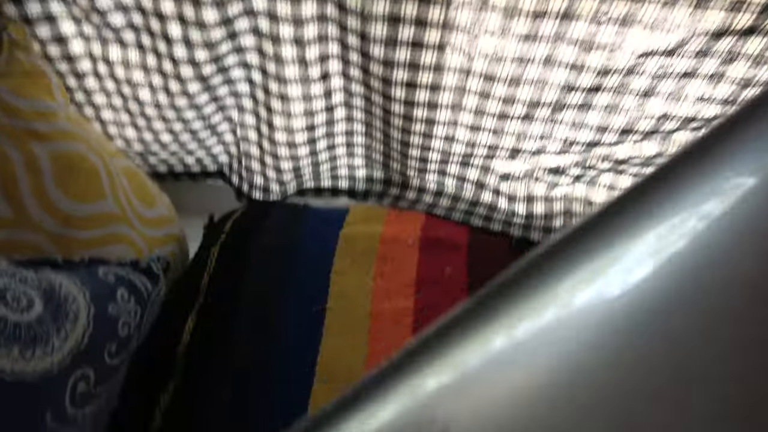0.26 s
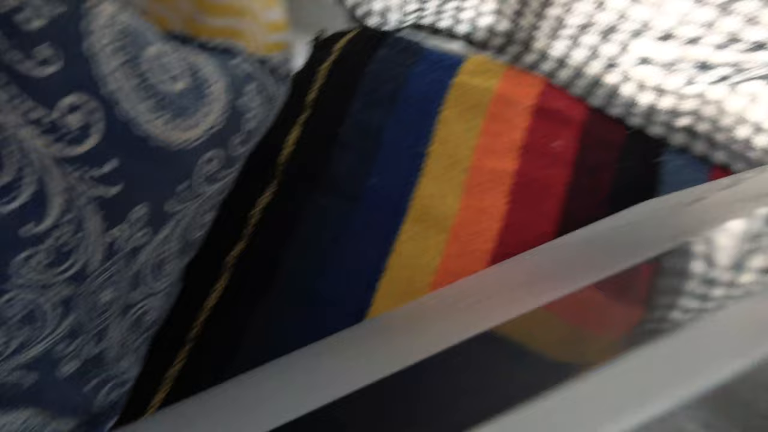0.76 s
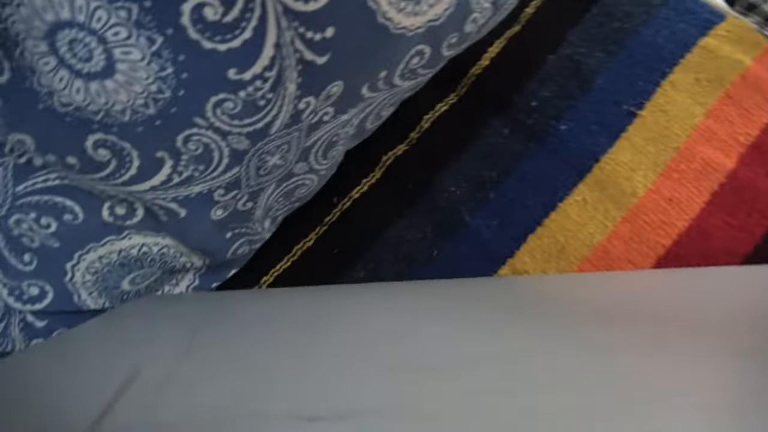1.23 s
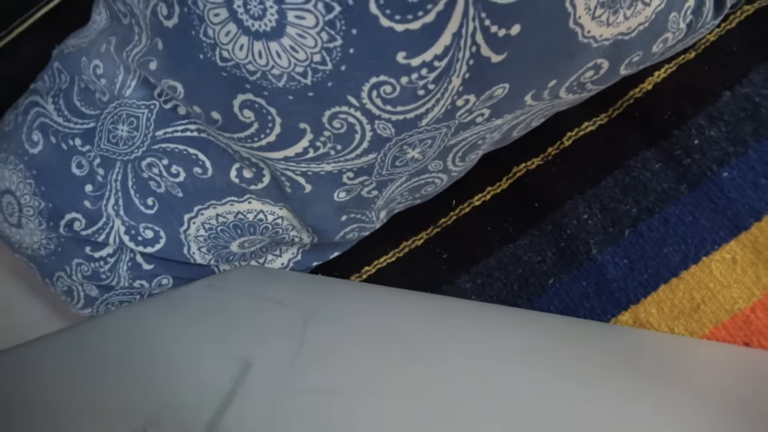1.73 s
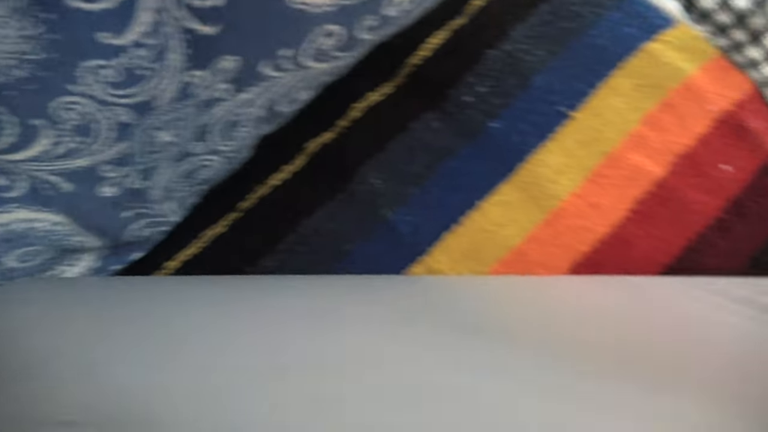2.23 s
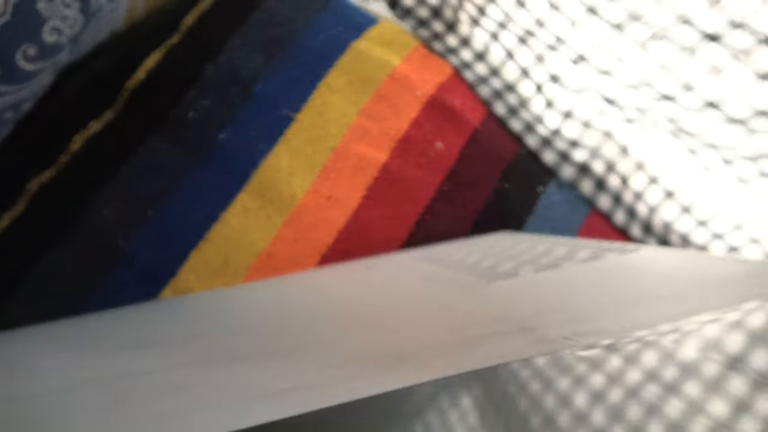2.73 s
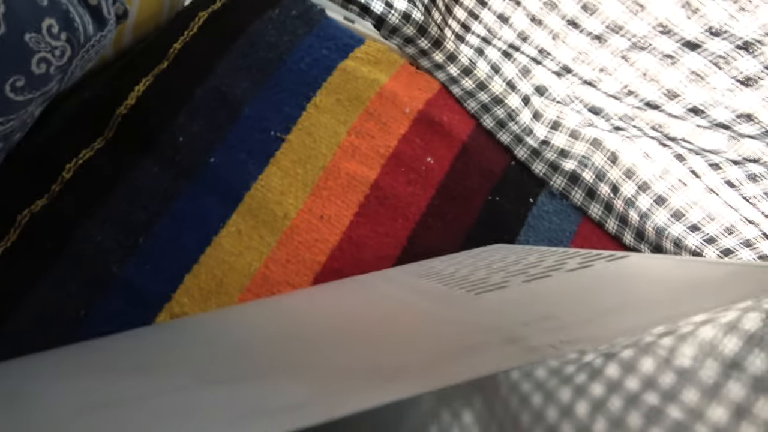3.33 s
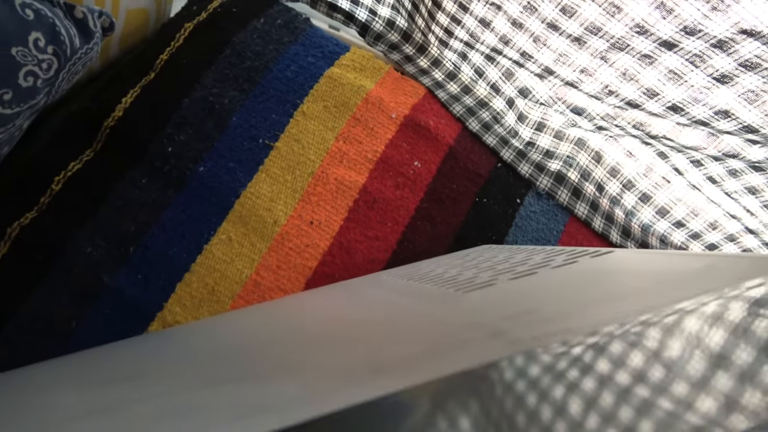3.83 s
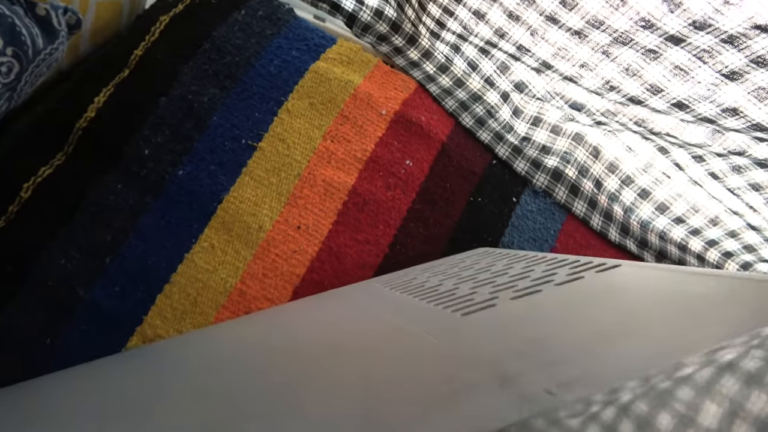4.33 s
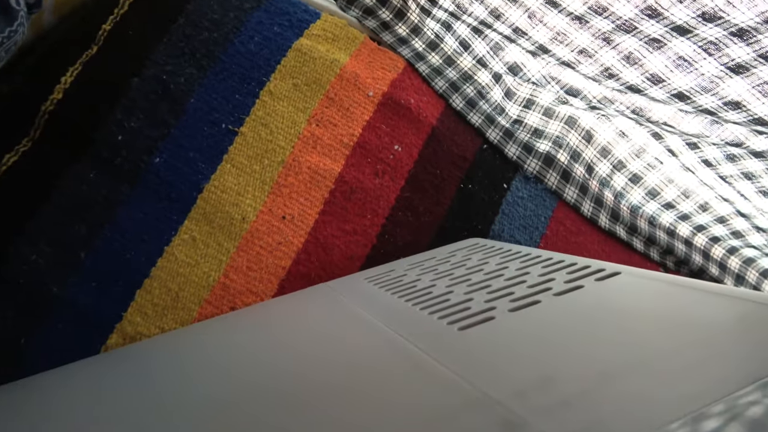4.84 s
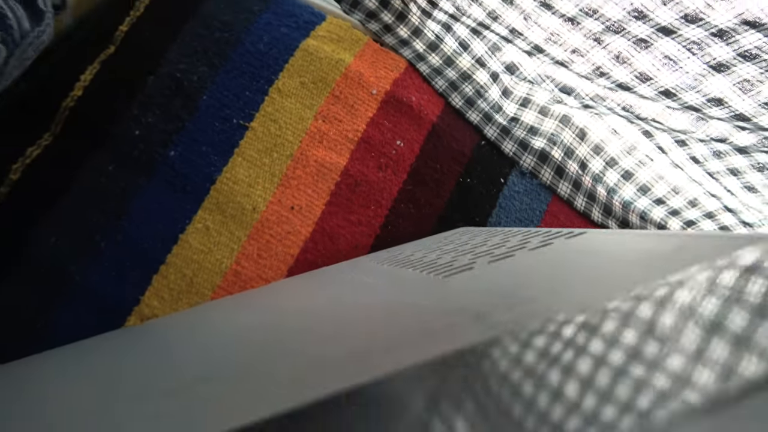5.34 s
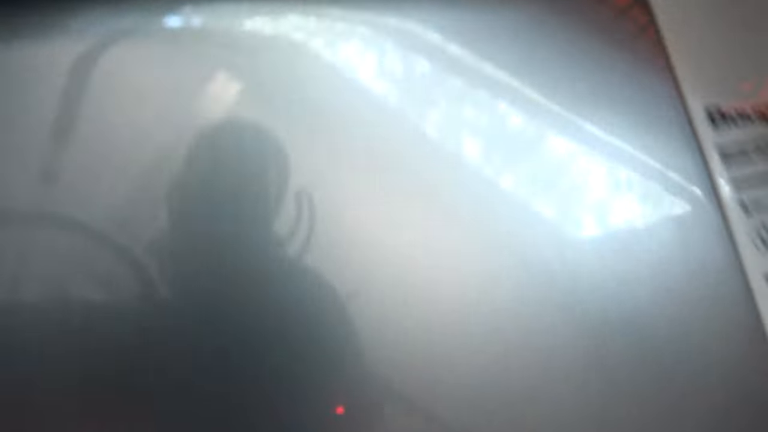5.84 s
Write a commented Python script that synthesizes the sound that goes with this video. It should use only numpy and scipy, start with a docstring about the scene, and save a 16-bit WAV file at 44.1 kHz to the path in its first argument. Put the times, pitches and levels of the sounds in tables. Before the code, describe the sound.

A small compressor fridge runs throughout, heard close up inside a parked van: a steady, slightly wavering low hum with soft fan air, a faint hiss and thin high whistles. During the first second and a half, cloth rustles softly and a hand rumbles on the microphone. Fingers tick on the plastic lid at about 0.4 and 1 second, with light knocks and two tiny pipe pings between them.

From about 1.6 to 2.2 seconds the lid is bumped: a quick run of hollow thumps and plastic clacks with a short latch scrape, the loudest moment. From around 2.6 seconds the hum and fan grow gradually louder as the microphone nears the vent, peaking a little after 5 seconds. Faint high pings come at 3.4 and 4.9 seconds. Cloth swishes softly near 3.9 seconds and again around 5.8 to 6.1 seconds, over the continuing hum.

```python
"""A small compressor fridge runs in a parked van: its valves buzz in the steel shell and the fan's
blade tone beats against the compressor's second order. From the start the hand on the microphone
rumbles and cloth rustles. Fingers tick on the plastic lid, light knocks follow and a cooling pipe
pings. Near two seconds the lid is bumped, its latch scrapes and it clatters briefly. Then hum and fan
grow louder as the microphone nears the vent; the pipe pings twice more and cloth brushes past."""
import sys
import numpy as np
from scipy import signal
from scipy.fft import rfft, irfft, next_fast_len
from scipy.io import wavfile

SR = 44100
rng = np.random.default_rng(int(sys.argv[2]) if len(sys.argv) > 2 else 0)


def pcm_store(signal):
    """Save signal as 16-bit PCM."""
    levels = np.round(np.clip(np.atleast_2d(signal), -1, 1) * 32767)
    wavfile.write(sys.argv[1], SR, levels.astype(np.int16).T)


N = 268745
TIME = np.arange(N) / SR
CUTOFF_HZ = 15650


def from_db(db):
    """Decibels to amplitude ratio."""
    return 10 ** (np.asarray(db) / 20)


def unit_power(x):
    """Normalisation to a mean square of 1."""
    return x / np.sqrt(np.mean(x ** 2) + 1e-20)


def in_time(rows):
    """Linear interpolation between (time_s, value) points."""
    return np.interp(TIME, *np.transpose(rows))


def swell(peak_s, half_width_s):
    """A Gaussian envelope of height 1."""
    return np.exp(-((TIME - peak_s) / half_width_s) ** 2)


def drift(rate_hz):
    """Low-passed noise: a random wander of unit power."""
    step, settle = 100, 2000
    r = np.exp(-2 * np.pi * rate_hz * step / SR)
    slow = signal.lfilter([1], [1, -2 * r, r * r], rng.standard_normal(N // step + settle + 2))[settle:]
    return np.interp(np.arange(N) / step, np.arange(len(slow)), unit_power(slow))


def noise(spectrum):
    """Spectrally shaped noise of unit power, falling away beyond both ends."""
    hz, db = np.transpose(spectrum)
    size = next_fast_len(N, real=True)
    f = np.maximum(np.arange(size // 2 + 1) * SR / size, 1)
    skirts = (np.minimum(f / hz[0], 1) * np.minimum(hz[-1] / f, 1)) ** 2
    gain = from_db(np.interp(np.log(f), np.log(hz), db)) * skirts
    return unit_power(irfft(rfft(rng.standard_normal(size)) * gain, size)[:N])


def soften(x, hz):
    """A second-order low-pass."""
    return signal.sosfilt(signal.butter(2, min(hz, CUTOFF_HZ), fs=SR, output="sos"), x)


def strikes(times_s, db):
    """Impulsive excitation: one click for each contact."""
    clicks = np.zeros(N)
    clicks[(times_s * SR).astype(int)] = from_db(db)
    return clicks


def ring(clicks, hz, t60_s):
    """A damped mode: a unit click starts a decaying sine of height 1."""
    r, w = np.exp(-np.log(1000) / (t60_s * SR)), 2 * np.pi * hz / SR
    return signal.lfilter([0, np.sin(w)], [1, -2 * r * np.cos(w), r * r], clicks + 1e-18)


def resonate(x, hz, width_hz):
    """A driven resonance of gain 1 at its peak."""
    r, w = np.exp(-np.pi * width_hz / SR), 2 * np.pi * hz / SR
    return signal.lfilter([(1 - r * r) / 2, 0, (r * r - 1) / 2], [1, -2 * r * np.cos(w), r * r], x)


def tone(cycles, waver_db):
    """A sine of unit power under slow random amplitude modulation."""
    return np.sqrt(2) * np.sin(2 * np.pi * cycles) * from_db(waver_db * drift(3.1))


# reflections from nearby walls: delay_s, gain_db
REFLECTIONS = [(.0023, -17), (.0041, -17), (.0067, -16), (.0094, -16)]


def walls(x):
    """Comb filtering by short reflections, whose paths shift slightly as the microphone moves."""
    echoes = sum(from_db(db) * np.interp(TIME - delay_s * (1 + .03 * drift(.3)), TIME, x)
                 for delay_s, db in REFLECTIONS)
    return unit_power(x + echoes)


# harmonics of the hum: crank_multiple, relative_db
CRANK_ORDERS = [(1, -0.5), (2, -4.5), (3, -20), (4, -23.5), (7, -38), (8, -38), (25, -52)]
# high orders that whistle in the shell: crank_multiple, peak_relative_db, antinode_s
WHISTLES = [(54, -19, 3.0), (66, -15, 4.3), (72, -9, 2.5), (77, -14, 4.6), (78, -11, 4.9), (87, -19, 3.5),
            (89, -15, 3.6), (90, -13, 2.6), (95, -22, 4.0), (160, -28, 4.7)]
# resonances of the steel shell: pitch_hz, width_hz, relative_db
SHELL_MODES = [(3590, 160, 7), (3900, 35, 17), (4140, 210, -2), (4076, 23, -2), (4260, 50, -12)]
# spectrum of the gas hiss: frequency_hz, relative_db
GAS_SPECTRUM = [(1500, -12), (2500, -4), (3300, 5), (4100, 5), (4900, -4), (6200, -9), (7200, -16.5),
                (7900, -14.5), (9000, -27.5), (12000, -23.5), (16000, -25)]
CRANK_HZ, WHISTLE_FADE_DB = 49.76, 6


def compressor(hum_db, hiss_db):
    """Periodic forcing: each piston stroke shakes the case, ticks the valves and passes a puff of gas."""
    turns = CRANK_HZ * TIME + .0012 * drift(1)
    hum = sum(from_db(db) * tone(round(k) * turns, waver_db=.5 if k < 2 else 1.2)
              for k, db in CRANK_ORDERS)
    whistles = 0
    for k, db, antinode_s in WHISTLES:  # each swells as the microphone passes its antinode
        fade_db = WHISTLE_FADE_DB * (1 - swell(antinode_s, half_width_s=1))
        whistles += from_db(db - fade_db) * tone(k * turns + rng.random(), waver_db=2)
    half_angle = np.pi * (turns % 1) + 1e-9
    ticks = unit_power(np.sin(241 * half_angle) / np.sin(half_angle))  # 120 equal crank orders
    valves = ticks + 1.7 * rng.standard_normal(N)
    buzz = unit_power(sum(from_db(db + 1.8 * drift(.54)) * resonate(valves, hz, width_hz)
                          for hz, width_hz, db in SHELL_MODES))
    puffs = 1 + .5 * np.cos(np.pi * turns) ** 16
    gas = walls(noise(GAS_SPECTRUM) * puffs) * from_db(.5 * drift(5.3))
    return from_db(hum_db) * hum + from_db(hiss_db) * (gas + whistles + from_db(-28) * buzz)


# rate of blade passes: time_s, rate_hz
BLADE_RATE = [(0, 93.8), (1, 92.55), (3.5, 92.55), (4.2, 92.95), (6.1, 92.8)]
# overtones, set against the air noise: blade_multiple, relative_db
BLADE_ORDERS = [(3, -13), (4, -21.5), (12, -21.5)]
# spectrum of air in the grille: frequency_hz, relative_db
AIR_SPECTRUM = [(200, -20), (400, -6), (650, -1.5), (850, 1), (1050, -0.5), (1300, 0.5), (1700, -5),
                (2400, -10.5), (4000, -18), (9000, -24.5), (16000, -31)]


def fan(blade_db, air_db):
    """A tone at the blade-passing frequency, faint harmonics, and broadband air noise from the grille."""
    passes = np.cumsum(in_time(BLADE_RATE)) / SR
    overtones = sum(from_db(db) * tone(round(k) * passes, waver_db=4.5) for k, db in BLADE_ORDERS)
    air = from_db(-2 + .5 * drift(11)) * walls(noise(AIR_SPECTRUM))
    return from_db(blade_db) * tone(passes, waver_db=3.5) + from_db(air_db) * (air + overtones)


# tones of the casing panels: pitch_hz, relative_db
PANEL_TONES = [(186.4, 1.5), (255.3, -7.5)]
# spectrum of the casing's rumble: frequency_hz, relative_db
RUMBLE_SPECTRUM = [(8, -37), (12, 16.5), (20, 8), (32, -3), (60, 2.5), (85, -1), (120, 6.5), (150, -2),
                   (200, -10), (280, -16), (400, -22.5), (700, -24.5), (1200, -64)]
DRONE_HZ = 129.1


def casing(drone_db, tones_db, rumble_db):
    """Vibrating panels radiate slightly unsteady tones over a low rumble."""
    drone = from_db(drone_db) * tone(DRONE_HZ * TIME + .15 * drift(1), waver_db=.9)
    tones = sum(from_db(db) * tone(hz * TIME + .2 * drift(1), waver_db=2.5) for hz, db in PANEL_TONES)
    return drone + from_db(tones_db) * tones + from_db(rumble_db) * noise(RUMBLE_SPECTRUM)


# spectrum of the hand's throb: frequency_hz, relative_db
THROB_SPECTRUM = [(10, 0), (19, 2), (30, -10), (60, -24), (150, -28), (300, -38), (600, -60)]
GRIP_S, GRIP_ATTACK_S, GRIP_HOLD_S, GRIP_RELEASE_S = .33, .07, .31, .8
MOVING_GRIP_DB, RESTING_GRIP_DB = -24, -40.5


def grip():
    """Structure-borne noise: the hand on the microphone throbs, most as it shifts its grip once."""
    corners_s = np.cumsum([GRIP_S, GRIP_ATTACK_S, GRIP_HOLD_S, GRIP_RELEASE_S])
    shift = np.interp(TIME, corners_s, [0, 1, 1, 0])
    return (from_db(RESTING_GRIP_DB) + from_db(MOVING_GRIP_DB) * shift) * noise(THROB_SPECTRUM)


# spectra of the soft swish and the crisp rustle: frequency_hz, relative_db
SWISH_SPECTRUM = [(2500, -0.5), (5500, -4.5), (7600, -8.5), (8600, -16), (14000, -27)]
RUSTLE_SPECTRUM = [(4000, -2), (8500, -3), (12500, 1.5), (16000, -12)]
# passes of the cloth: peak_s, half_width_s, swish_db, rustle_db
BRUSHES = [(.11, 0.065, -55, -64), (.42, 0.35, -61, -67), (0.91, 0.25, -59, -75), (1.238, 0.25, -74, -66.5),
           (3.9, 0.16, -54.5, -77), (5.45, 0.03, -70, -64), (5.71, 0.093, -78, -57),
           (5.853, 0.044, -48.5, -60), (6.06, 0.073, -51.5, -64)]


def cloth():
    """Friction noise: a grainy swish and rustle swell and fade as cloth brushes past."""
    grain = from_db(2 * drift(70))
    swish = unit_power(noise(SWISH_SPECTRUM) * grain)
    rustle = unit_power(noise(RUSTLE_SPECTRUM) * grain)
    return sum(swell(peak_s, half_width_s) * (from_db(swish_db) * swish + from_db(rustle_db) * rustle)
               for peak_s, half_width_s, swish_db, rustle_db in BRUSHES)


# spectra of the hollow clack and the bright snap: frequency_hz, relative_db
CLACK_SPECTRUM = [(200, 13), (350, -1.5), (450, -1), (650, 1), (1000, -2), (1300, -7), (1700, -13),
                  (2200, -4), (3500, -20), (6000, -30)]
SNAP_SPECTRUM = [(1000, -3), (2100, -10.5), (2700, -4), (3400, 6), (4100, 0), (5000, -5), (6500, -14.5),
                 (9000, -18), (12000, -21.5), (16000, -38)]


def plastic_noise():
    """Contact noise of plastic: a clack and a snap under one grainy amplitude modulation."""
    grain = from_db(1.3 * drift(120))
    return walls(noise(CLACK_SPECTRUM)) * grain, walls(noise(SNAP_SPECTRUM)) * grain


def contact(plastic, start_s, clack_db, snap_db, hardness_hz, t60_s):
    """An impact's noise decays exponentially; a softer contact has a lower cutoff."""
    clack, snap = plastic
    decay = np.exp(-np.log(1000) * TIME[:SR // 2] / t60_s)
    span = slice(int(start_s * SR), int(start_s * SR) + len(decay))
    burst = decay * (from_db(clack_db) * clack[span] + from_db(snap_db) * snap[span])
    out = np.zeros(N)
    out[span] = soften(burst, hardness_hz)
    return out


# fingers touching the lid: start_s, clack_db, snap_db, hardness_hz
FINGER_TICKS = [(.374, -36, -27.5, 15000), (0.941, -55, -39, 13000), (0.982, -28.5, -31, 3000)]


def finger_ticks(plastic):
    """Light impacts on plastic make transients that die at once."""
    return sum(contact(plastic, *tick, t60_s=.021) for tick in FINGER_TICKS)


# modes of the plastic lid: pitch_hz, relative_db, t60_s
LID_MODES = [(462, -2, 0.14), (562, -9.5, 0.4), (834, -1, 0.079), (950, 1.5, 0.07), (1310, -25, 0.041),
             (1497, -4.5, 0.06), (1850, -3, 0.016), (1960, -8, 0.086), (2110, -6, 0.047), (2170, -8, 0.035),
             (2482, -9, 0.08)]


def lid_ring():
    """Modal ringing: every tick and knock excites the lid in a mix that depends on the spot struck."""
    hits = [(s, db) for s, _, _, db, _, _ in LID_KNOCKS] + [(s, db) for s, db, _, _ in FINGER_TICKS]
    start_s, clack_db = np.transpose(hits)
    drive_db = clack_db - 8
    spots_db = rng.normal(0, 1.5, (len(hits), len(LID_MODES))).T
    return sum((-1) ** k * ring(strikes(start_s, drive_db + db + spots_db[k]), hz, t60_s)
               for k, (hz, db, t60_s) in enumerate(LID_MODES))


# knocks on the lid: start_s, thump_db, favoured_hz, clack_db, hardness_hz, t60_s
LID_KNOCKS = [(0.584, -40, 287, -44, 2000, .06), (.732, -34.5, 242, -62, 2000, .04),
              (1.640, -14, 160, -24.5, 3500, 0.059), (1.778, -8, 94.6, -22, 8000, 0.075),
              (1.819, -8, 233, -29.5, 5500, 0.17), (1.906, -15.5, 100, -33, 3500, .07),
              (1.923, -15.5, 234, -48, 3000, .07), (1.934, -21, 157, -27, 3800, .2),
              (1.954, -12, 154, -47, 3000, .25), (1.998, -11, 103, -35.5, 3000, 0.088),
              (2.016, -13, 71, -18.5, 12000, 0.13), (2.070, -13.5, 95, -33.5, 4000, 0.25)]
SNAP_DB, CHATTER_DB = -7, -12  # against the clack; against the knock
MIDDLING_HZ, SNAP_DB_PER_OCTAVE = 5000, 1.5


def lid_clatter(plastic):
    """Harder impacts carry more treble and so snap more; each knock trails a weaker chatter."""
    out = np.zeros(N)
    for start_s, _, _, clack_db, hardness_hz, t60_s in LID_KNOCKS:
        snap_db = clack_db + SNAP_DB + SNAP_DB_PER_OCTAVE * np.log2(hardness_hz / MIDDLING_HZ)
        out += contact(plastic, start_s, clack_db, snap_db, hardness_hz, t60_s)
        out += contact(plastic, start_s, clack_db + CHATTER_DB, snap_db + CHATTER_DB,
                       hardness_hz=3800, t60_s=.23)
    return out


# modes of the hollow cabinet: pitch_hz, relative_db, t60_s
CABINET_MODES = [(70.7, 6.5, 0.19), (93.6, 13, 0.048), (153.3, 5, 0.14), (232, -0.5, 0.28),
                 (275, -4.5, 0.21), (338, -3.5, .14)]
REBOUND_S, REBOUND_OVER_CLACK_DB, REBOUND_HZ = .0121, 4, 244


def cabinet_thumps():
    """Selective excitation: a cushioned knock and the lid's rebound ring modes near a favoured pitch."""
    start_s, thump_db, favoured_hz, clack_db, *_ = np.transpose(LID_KNOCKS)
    blows = [(start_s, thump_db, favoured_hz),
             (start_s + REBOUND_S, clack_db + REBOUND_OVER_CLACK_DB, REBOUND_HZ)]
    out = np.zeros(N)
    for k, (hz, db, t60_s) in enumerate(CABINET_MODES):
        for at_s, blow_db, pitch_hz in blows:
            mismatch_db = 14 * np.minimum(np.abs(np.log2(hz / pitch_hz)), 1)
            clicks = strikes(at_s, blow_db + db - mismatch_db)
            out += (-1) ** k * ring(clicks, hz, t60_s)  # opposed modes swell in
    return soften(out, hz=405)


# thin pings of the cooling pipe: start_s, level_db, pitch_hz
PIPE_PINGS = [(0.741, -37.5, 4050), (.800, -43, 4050), (3.437, -42, 4120), (4.896, -35, 3890)]


def pipe_pings():
    """Free vibration of the pipe: each ping is one high, damped mode."""
    return sum(ring(strikes(start_s, db), hz, t60_s=.056) for start_s, db, hz in np.array(PIPE_PINGS))


# modes of the latch: pitch_hz, relative_db, t60_s
LATCH_MODES = [(2450, -3, 0.03), (2840, -4, .035), (3150, -7, .04), (3310, 3.5, 0.034), (3350, -9, 0.062),
               (3740, 3.5, 0.029), (4040, -9, 0.035)]
LATCH_S, LATCH_DB, SLIP_S, SLIP_LOSS_DB = 1.682, -26, .0027, 5.5


def latch(plastic):
    """Stick-slip friction: the latch scrapes over in four weakening slips that ring clustered modes."""
    slip = np.arange(4)
    slips_s = LATCH_S + SLIP_S * slip * rng.uniform(.85, 1.15, len(slip))
    clicks = strikes(slips_s, LATCH_DB - SLIP_LOSS_DB * slip)
    modes = sum((-1) ** k * from_db(db) * ring(clicks, hz, t60_s)
                for k, (hz, db, t60_s) in enumerate(LATCH_MODES))
    scrape = contact(plastic, LATCH_S, clack_db=-np.inf, snap_db=-31.5, hardness_hz=5500, t60_s=.16)
    return modes + scrape


def node_loss(nodes):
    """Standing waves: the dB a tone loses as the microphone crosses nodes; antinodes are negative."""
    return sum(loss_db * swell(time_s, half_width_s) for time_s, half_width_s, loss_db in nodes)


# nearness to the vent, as a level taken about its mean: time_s, level_db
NEARNESS = [(0, -46.8), (0.9, -45.1), (1.4, -44.8), (2.6, -44.5), (3.5, -42.4), (4.4, -40.1), (5.3, -38.0),
            (6.09, -38.7)]
# standing waves of the blade tone and the drone: time_s, half_width_s, loss_db
BLADE_NODES = [(.2, 0.33, 25), (1.42, 0.29, 5.5), (2.3, 0.38, -4.5), (3.17, 0.46, 11), (4.6, .45, 12)]
DRONE_NODES = [(1.7, 1.0, 22.6)]


def scene():
    """Superposition in mono; nearness to the vent raises each running sound by its own factor."""
    near_db = in_time(NEARNESS) - in_time(NEARNESS).mean()
    fridge = compressor(hum_db=-22.5 + .94 * near_db, hiss_db=-51 + .76 * near_db)
    fridge += fan(blade_db=-24 + near_db - node_loss(BLADE_NODES), air_db=-45.5 + .87 * near_db)
    fridge += casing(drone_db=-30.5 + near_db - node_loss(DRONE_NODES),
                     tones_db=-41.5 + 1.27 * near_db, rumble_db=-28.5 + 1.14 * near_db)
    ringing = lid_ring() + cabinet_thumps() + pipe_pings()
    plastic = plastic_noise()
    contacts = finger_ticks(plastic) + lid_clatter(plastic) + latch(plastic)
    return (fridge + grip() + cloth() + ringing + contacts)[None]


def record(dry):
    """An elliptic low-pass cuts the top steeply."""
    return signal.sosfilt(signal.ellip(12, .1, 90, CUTOFF_HZ, fs=SR, output="sos"), dry)


dry = scene()
out = record(dry)
pcm_store(out)
```